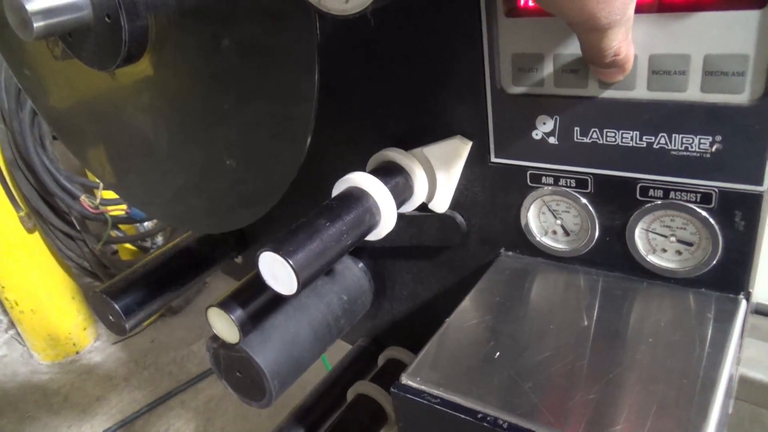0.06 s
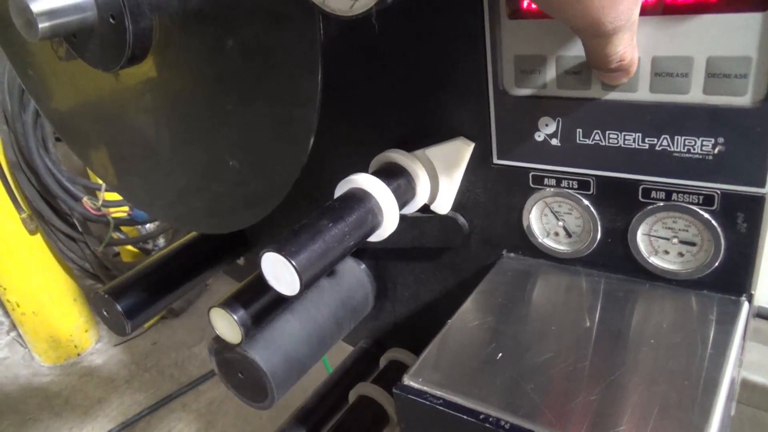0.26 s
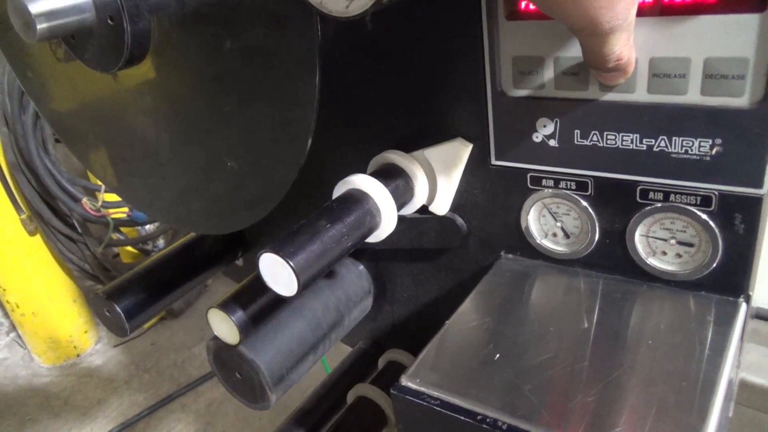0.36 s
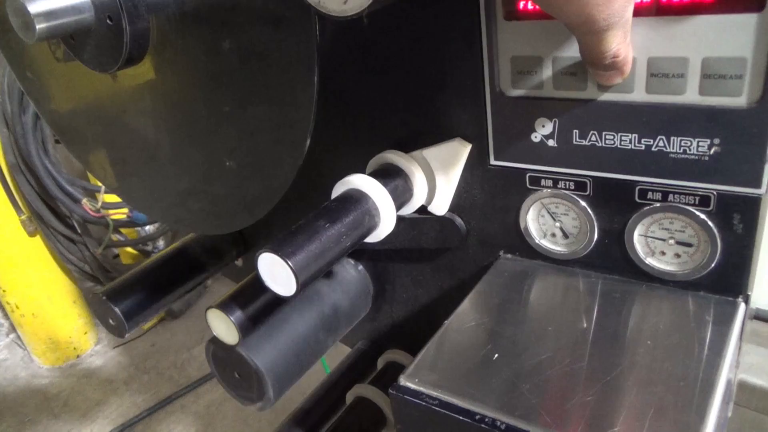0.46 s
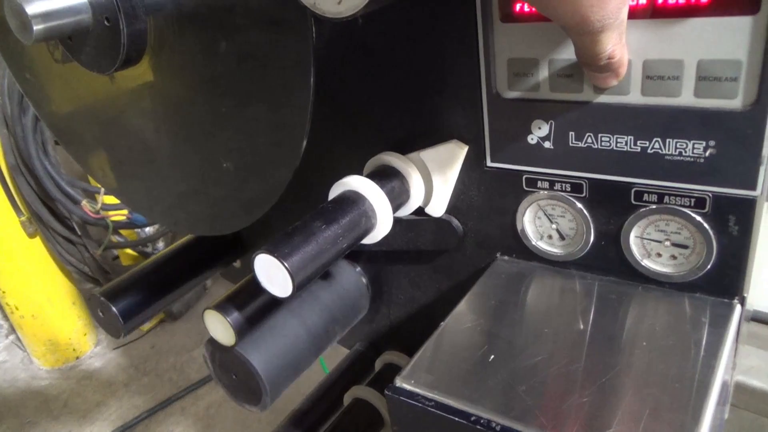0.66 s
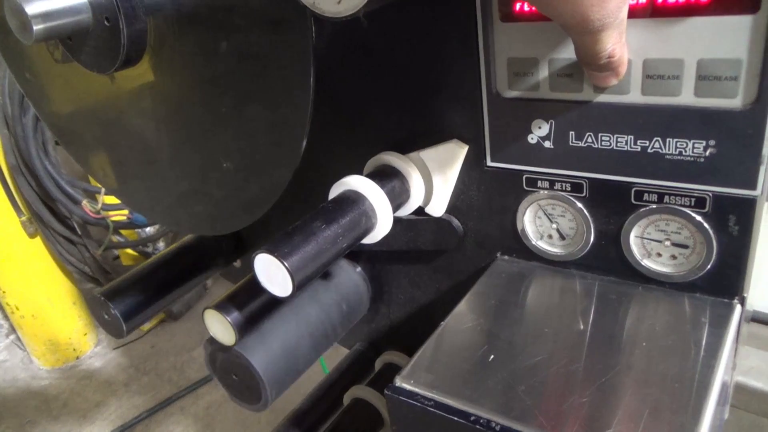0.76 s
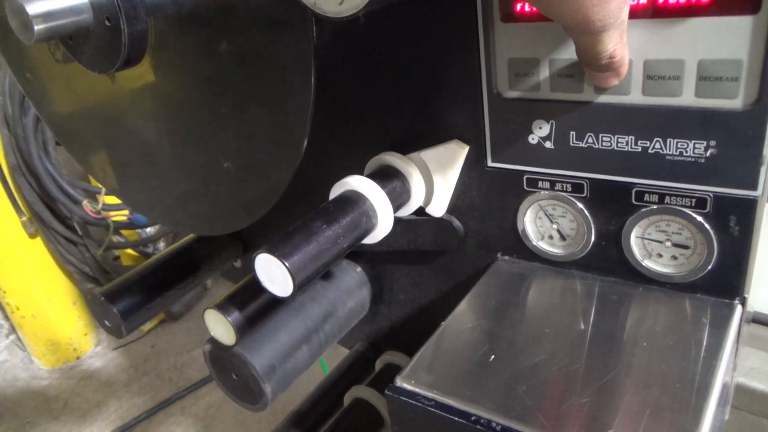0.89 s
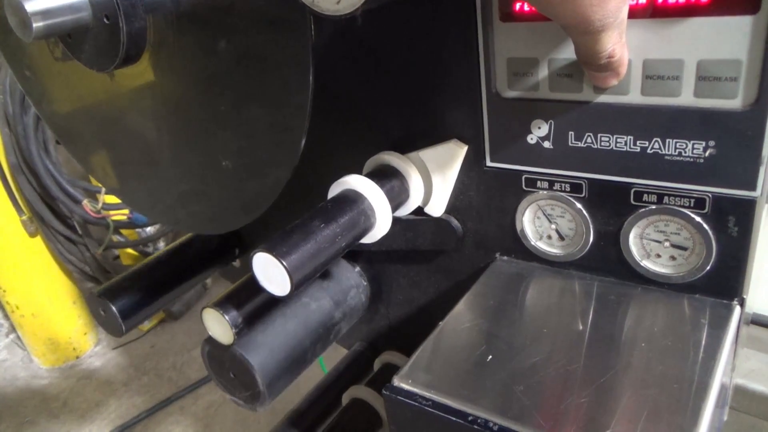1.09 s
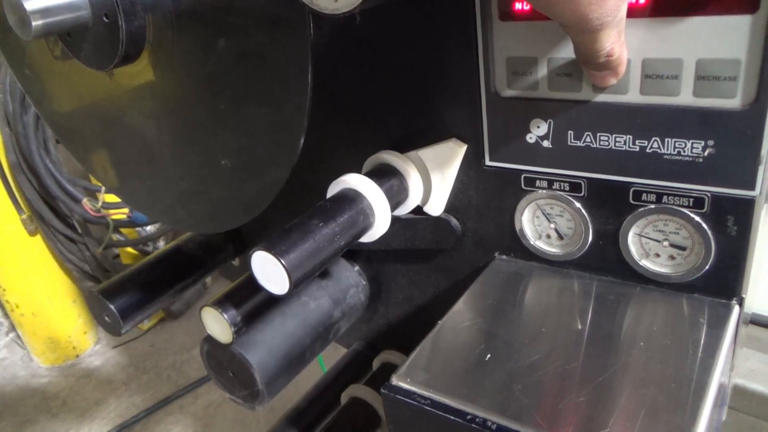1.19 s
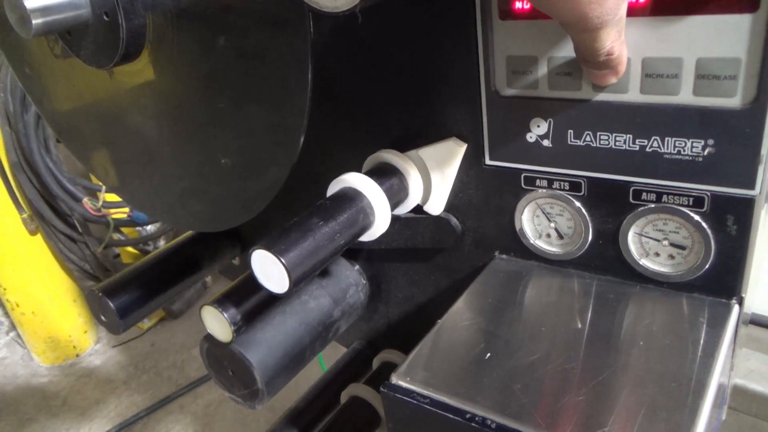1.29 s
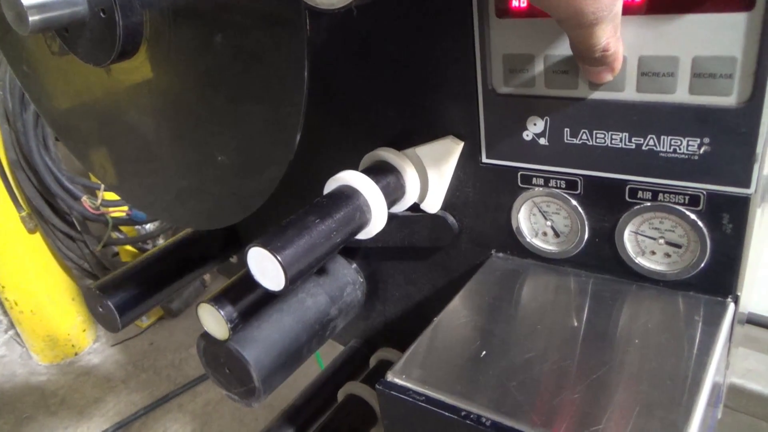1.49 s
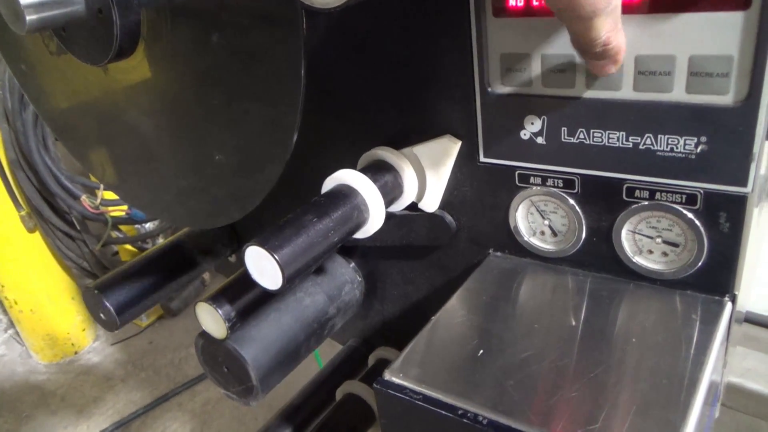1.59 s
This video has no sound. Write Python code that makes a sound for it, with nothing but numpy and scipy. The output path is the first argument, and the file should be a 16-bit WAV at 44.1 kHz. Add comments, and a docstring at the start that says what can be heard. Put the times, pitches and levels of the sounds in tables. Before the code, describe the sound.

A sharp burst of compressed air hisses from a labeling machine over low workshop hum.

```python
"""A workshop, the stereo microphone close to a labelling machine, other machines humming farther off. A button
is pressed: a relay ticks, an air valve snaps open, and compressed air hisses from the jets for almost a second
until the valve clacks shut. A few dull knocks follow. The recorder's gain control ducks everything under the
blast and recovers slowly."""
import sys
import numpy as np
from scipy import signal
from scipy.fft import rfft, irfft
from scipy.io import wavfile
from scipy.ndimage import uniform_filter1d

SR = 44100
rng = np.random.default_rng(int(sys.argv[2]) if len(sys.argv) > 2 else 0)


def dump(signal):
    """Clip the signal to [-1, 1] and save it as 16-bit WAV at the path in sys.argv[1]."""
    limited = np.clip(np.atleast_2d(signal).T, -1, 1)
    pcm = np.round(limited * 32767).astype(np.int16)
    wavfile.write(sys.argv[1], SR, pcm)


N = 72765
TIME = np.arange(N) / SR
FREQS = np.maximum(np.arange(N // 2 + 1) * SR / N, 1)


def from_db(db):
    """Decibels to gain."""
    return 10 ** (np.asarray(db) / 20)


def rms_one(x):
    """Scale to unit rms."""
    return x / np.sqrt(np.mean(x ** 2) + 1e-20)


def colour(points):
    """Gain at every frequency from (Hz, dB) points."""
    hz, db = np.transpose(points)
    return from_db(np.interp(np.log(FREQS), np.log(hz), db))


def low_pass(hz, order):
    """Gain at every frequency, falling away above hz."""
    return 1 / (1 + (FREQS / hz) ** order)


def resonances(rows):
    """Gain at every frequency of steep-sided resonances."""
    return np.sqrt(sum((from_db(db) / (1 + ((FREQS - hz) / width) ** 2)) ** 2 for hz, width, db in rows))


def noise(gain):
    """Unit noise of a given colour."""
    return rms_one(irfft(rfft(rng.standard_normal(N)) * gain, N))


def stereo_noise(gain, side_points):
    """Unit noise that differs a little between left and right."""
    mid, side = rfft(rng.standard_normal((2, N))) * gain
    side = side * colour(side_points)
    return rms_one(irfft(np.array([mid + side, mid - side]), N))


def drift(rate_hz):
    """Slow random wander with unit spread."""
    return noise(low_pass(rate_hz, 2))


def decay(start, t60):
    """Sudden start and exponential fall."""
    return (TIME >= start) * from_db(-60 * np.maximum(TIME - start, 0) / t60)


def bursts(rows, points):
    """Short impacts: noise of one colour that dies quickly."""
    return sum(from_db(db) * decay(start, t60) * noise(colour(points)) for start, db, t60 in rows)


def lean(x, balance_points):
    """Shift each frequency toward one side."""
    ratio = np.sqrt(colour(balance_points))
    return irfft(rfft(x) * np.array([ratio, 1 / ratio]), N)


def no_bass(x, lowest_hz=221):
    """Small parts radiate little bass."""
    return signal.sosfilt(signal.butter(4, lowest_hz, "high", fs=SR, output="sos"), x + 1e-18)


# The distant machines. Each row: frequency in Hz, relative level in dB.
SHOP_SPECTRUM = [(24, -68), (40, -42), (80, -41), (103, -33.5), (158, -2.5), (496, -1), (621, 0.5),
                 (670, 0), (722, -2.5), (1190, -7), (1520, -3), (1730, -9), (2640, -12.5), (3560, -17.5),
                 (4800, -15), (6640, -26), (15500, -33)]
# Their ringing casings and ducts. Each row: frequency in Hz, width in Hz, relative level in dB.
CASING_MODES = [(122, 11, -4.5), (163, 29, -4), (485, 35, 12.5), (562, 51, 4), (1420, 82, 2),
                (1570, 54, -0.5), (2640, 65, -0.5), (4040, 90, -0.5), (4750, 150, -3)]
# Their steady hums. Each row: pitch in Hz, mid level in dB.
HUM_TONES = [(120, -53), (685, -38)]
# The shop's width at the microphone. Each row: frequency in Hz, side against mid in dB.
SHOP_WIDTH = [(100, -32), (300, -16.5), (1000, -26), (4000, -18.5), (12000, -10)]
# Its direction. Each row: frequency in Hz, left over right in dB.
SHOP_PAN = [(220, -0.5), (400, -1.5), (650, -3), (1150, -4.5), (3200, -2), (4200, -1), (5700, -3.5),
            (10000, 0.5)]
def workshop():
    """Far off and mostly to the right: steady machine noise, ringing casings, wavering hums."""
    air_loss = low_pass(15500, 10)
    machines = from_db(-27.5) * stereo_noise(colour(SHOP_SPECTRUM) * air_loss, SHOP_WIDTH)
    casings = from_db(-35) * stereo_noise(resonances(CASING_MODES), SHOP_WIDTH)
    hum = np.zeros(N)
    for hz, db in HUM_TONES:
        amplitude = np.sqrt(2) * from_db(db + 3.4 * drift(rate_hz=5.1))
        hum += amplitude * np.sin(2 * np.pi * (hz * TIME + rng.random()))
    return lean(machines + casings + hum, SHOP_PAN)


# Relay and valve seat, close up. Each row: start in seconds, level in dB, t60 in seconds.
TICK_HITS = [(.2166, -20.5, 0.017), (.229, 7, 0.0056), (1.131, -1.5, 0.013)]
# Their colour. Each row: frequency in Hz, relative level in dB.
TICK_SPECTRUM = [(200, -26), (600, 8), (1800, 3), (3500, -3.5), (6000, -1), (10000, 1), (15000, 0.5)]
def ticks():
    """The relay ticks sharply, then the valve seat on opening and on shutting."""
    return no_bass(bursts(TICK_HITS, TICK_SPECTRUM))


# The jets, close to the microphone. Each row: frequency in Hz, relative level in dB.
HISS_SPECTRUM = [(2000, -19.5), (2430, -23.5), (3000, -16.5), (4200, -14.5), (5650, -13.5), (6150, -13),
                 (7400, -9.5), (8550, -8.5), (9700, -7.5), (10700, -1.5), (12450, -5.5), (13500, -8),
                 (14200, -11), (14600, -5.5), (15700, -15.5)]
# Nozzle and air box resonances. Each row: frequency in Hz, width in Hz, relative level in dB.
NOZZLE_MODES = [(2740, 180, -15.5), (3315, 81, -11.5), (3527, 62, -14), (3940, 130, -17.5),
                (4994, 450, -10), (5600, 25, -14), (5900, 82, -25), (6450, 55, -16), (7840, 250, -8.5),
                (8900, 250, -4), (11260, 670, -3), (11770, 530, 1.5), (12970, 360, -2.5), (14700, 180, -6)]
# The jets' width. Each row: frequency in Hz, side against mid in dB.
HISS_WIDTH = [(2000, -63), (8000, -66), (12000, -27)]
# Echoes off the steel tray and housing. Each row: delay in seconds, gain in dB.
STEEL_ECHOES = [(.0031, -17), (.0047, -16.5)]
def jet_hiss():
    """Escaping air hisses and rings the nozzles; nearby steel throws the sound back."""
    low_cut = 1 / np.sqrt(1 + (2000 / FREQS) ** 4)
    hiss = from_db(-4.5) * stereo_noise(colour(HISS_SPECTRUM) * low_cut, HISS_WIDTH)
    nozzles = from_db(-5) * stereo_noise(resonances(NOZZLE_MODES), HISS_WIDTH)
    direct = hiss + nozzles
    echoes = sum(from_db(db) * np.roll(direct, int(delay * SR), axis=1) for delay, db in STEEL_ECHOES)
    return direct + echoes


# Faint tones at the nozzle edges. Each row: pitch in Hz, level in dB.
EDGE_TONES = [(2800, -34), (3380, -27.5), (4930, -22.5), (5735, -31)]
def whistles():
    """Air over the edges whistles unsteadily, wandering in pitch."""
    out = np.zeros(N)
    for hz, db in EDGE_TONES:
        pitch_hz = hz * (1 + .008 * drift(rate_hz=4))
        out += from_db(db) * drift(rate_hz=22) * np.sin(2 * np.pi * np.cumsum(pitch_hz) / SR)
    return out


# The air box, close up. Each row: frequency in Hz, relative level in dB.
RUSH_SPECTRUM = [(200, -19.5), (450, -1), (800, 0.5), (1200, -5), (1650, -11.5), (2050, -2.5),
                 (2400, -12.5), (3000, -11)]
# Its width. Each row: frequency in Hz, side against mid in dB.
RUSH_WIDTH = [(200, -17), (700, -13), (1400, -24), (2500, -52)]
# Its direction. Each row: frequency in Hz, left over right in dB.
RUSH_PAN = [(300, -1), (750, -1.4), (1400, 0.36)]
def air_box_rush():
    """Air through the box adds a low rush, just right of centre."""
    band = FREQS / (FREQS + 200) * low_pass(3000, 2)
    rush = from_db(-22) * stereo_noise(colour(RUSH_SPECTRUM) * band, RUSH_WIDTH)
    return lean(rush, RUSH_PAN)


def air_blast(open_s=0.2272, shut_s=1.1213):
    """Hiss, whistles and rush follow the pressure; as it drains, the treble dies first."""
    build_s, bright_drain_s, dull_drain_s = 0.0093, 0.012, 0.02   # time constants
    build_up = 1 - np.exp(-np.maximum(TIME - open_s, 0) / build_s)
    since_shut = np.maximum(TIME - shut_s, 0)
    flutter = from_db(0.8 * drift(rate_hz=24))
    air = jet_hiss() + whistles() + air_box_rush()
    dull = irfft(rfft(air) * low_pass(6000, 4), N)
    bright = (air - dull) * np.exp(-since_shut / bright_drain_s)
    return build_up * flutter * (bright + dull * np.exp(-since_shut / dull_drain_s))


# The plunger, close up. Each row: start in seconds, level in dB, t60 in seconds,
# treble corner in Hz, end of travel (0 open, 1 shut).
PLUNGER_STROKES = [(.229, -5, 0.043, 8000, 0), (1.1279, -8.5, 0.029, 2500, 1),
                   (1.1312, -7.5, 0.08, 4000, 1), (1.14, -16, .06, 5000, 1)]
# Valve and bracket. Each row: pitch in Hz, opening level in dB, shutting level in dB, share of t60.
VALVE_MODES = [(483, -17, -15, 1), (610, -21, -12, 1), (1160, -22, -10, 0.77), (1227, -28, -7.5, 0.89),
               (1600, -12, -18, 1), (1770, -6, -22, 0.93), (1953, -7, -13, 1), (2210, -7.5, -18, 0.82),
               (2710, -12, -5.5, 0.44), (4820, -5, -8, 0.69)]
def valve():
    """Each stroke of the plunger rings the valve's modes, in a mix set by which end it hits."""
    out = np.zeros(N)
    for start, db, t60, dull_hz, shut in PLUNGER_STROKES:
        for hz, open_db, shut_db, share in VALVE_MODES:
            mode_db = db + (shut_db if shut else open_db) + rng.normal()
            strength = from_db(mode_db) / np.sqrt(1 + (hz / dull_hz) ** 2)
            ring = decay(start, t60 * share) * np.sin(2 * np.pi * hz * (TIME - start))
            out += rng.choice([-1, 1]) * strength * ring
    return no_bass(out)


# Knocks. Each row: start in seconds, level in dB, t60 in seconds.
KNOCK_HITS = [(1.152, -21, 0.018), (1.197, -16, 0.036), (1.215, -18, 0.024), (1.414, -23, .03),
              (1.43, -29, 0.03)]
# Their colour. Each row: frequency in Hz, relative level in dB.
KNOCK_SPECTRUM = [(200, -24), (450, 5.5), (620, 13), (900, -10), (1800, -5), (4000, -37), (12000, -70)]
def knocks():
    """Dull impacts, leaning the same way as the distant machines."""
    return lean(no_bass(bursts(KNOCK_HITS, KNOCK_SPECTRUM)), SHOP_PAN)


def room(x):
    """A faint diffuse tail from the walls."""
    tail = rms_one(rng.standard_normal(N) * decay(start=0.019, t60=0.31)) / np.sqrt(N)
    return from_db(-29.5) * signal.fftconvolve(x, tail[None], axes=1)[:, :N]


def scene():
    """The labeller close to the microphone, the workshop behind it."""
    labeller = ticks() + air_blast() + valve()
    return workshop() + labeller + room(labeller) + knocks()


def gain_control(x):
    """The recorder's look-ahead limiter: part of its cut lets go at once, the rest lingers."""
    limit_db, slope, look_ahead_s, smooth_s = -13, 0.89, 0.021, 0.0084
    held_share, recover_db_per_s = 0.52, 4.5
    power = uniform_filter1d(np.mean(x ** 2, axis=0), size=700)
    level_db = 10 * np.log10(np.maximum(power, 1e-12))
    coming_db = np.interp(TIME + look_ahead_s, TIME, level_db)
    cut_db = slope * np.maximum(coming_db - limit_db, 0)
    recovery_db = recover_db_per_s * TIME
    held_db = np.maximum.accumulate(cut_db + recovery_db) - recovery_db
    duck_db = held_share * held_db + (1 - held_share) * cut_db
    pole = np.exp(-1 / (smooth_s * SR))
    return x * from_db(-signal.lfilter([1 - pole], [1, -pole], duck_db))


def record(dry):
    """At the recorder: gain control, rounded peaks, then a steep cut of the top."""
    ceiling, cutoff_hz = .95, 15800
    ducked = gain_control(dry)
    rounded = ducked / (1 + (ducked / ceiling) ** 8) ** (1 / 8)
    top_cut = np.clip((cutoff_hz - FREQS) / 200 + .5, 0, 1)
    return irfft(rfft(rounded) * top_cut, N)


dry = scene()
out = record(dry)
dump(out)
```